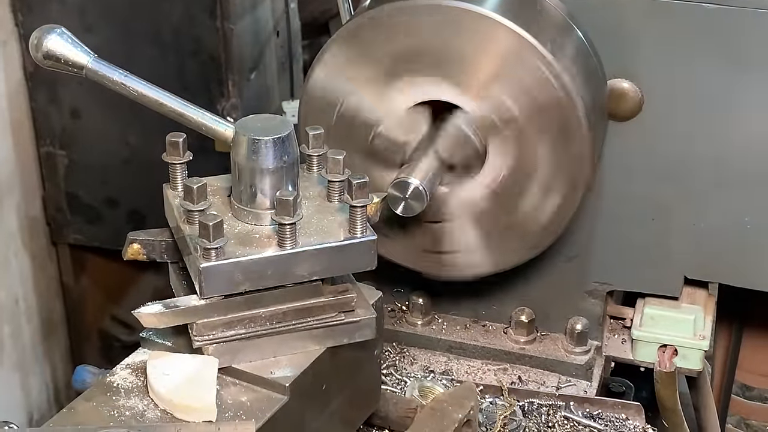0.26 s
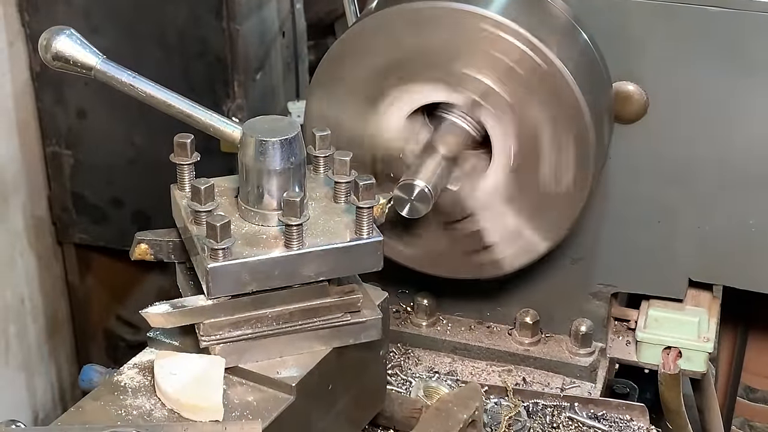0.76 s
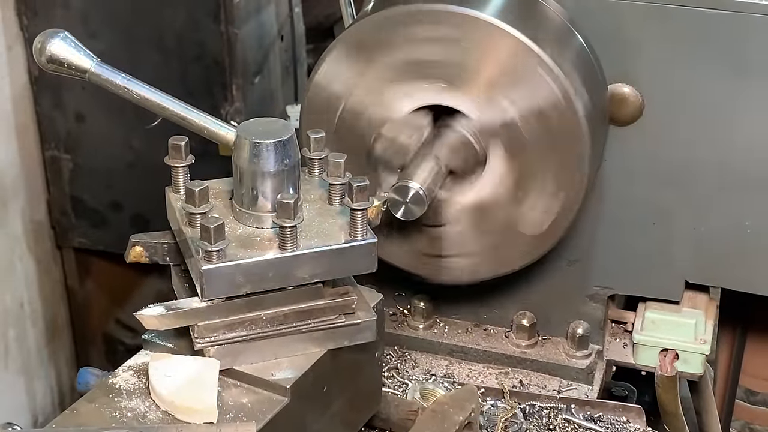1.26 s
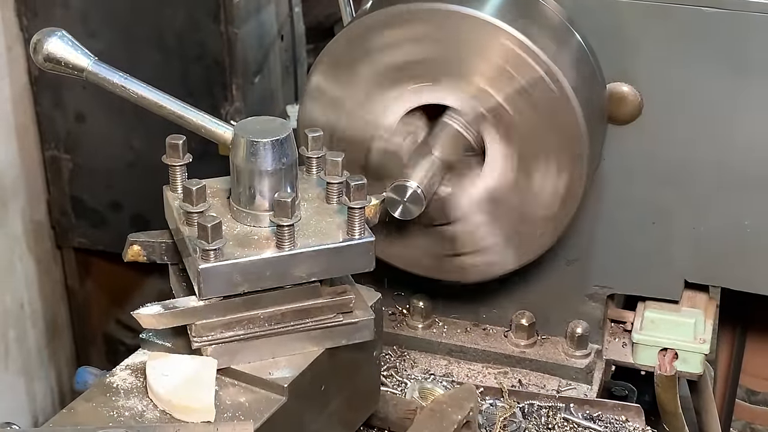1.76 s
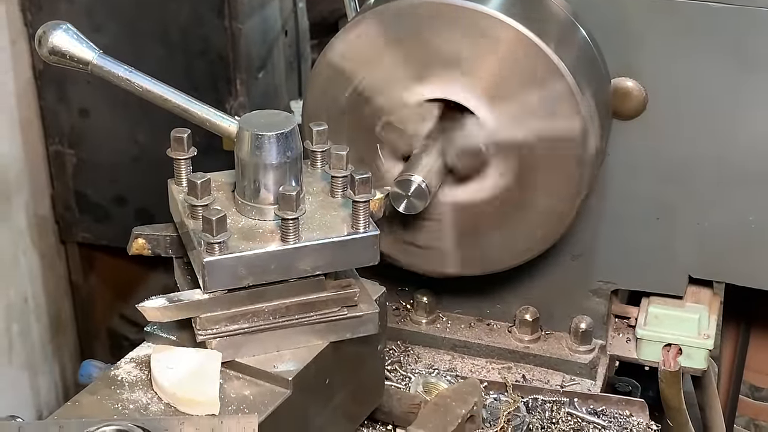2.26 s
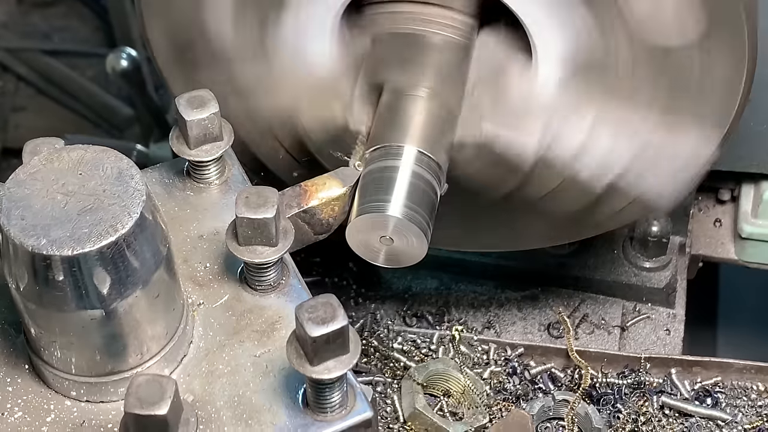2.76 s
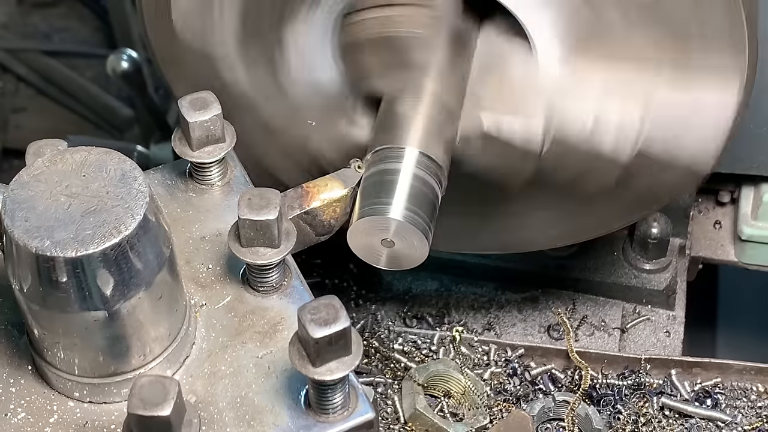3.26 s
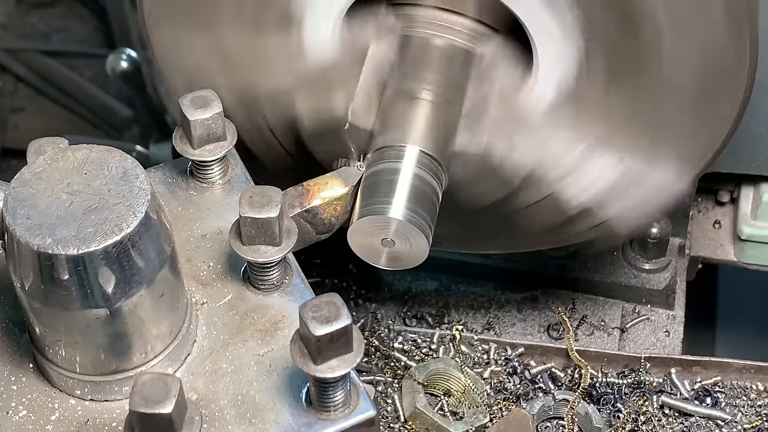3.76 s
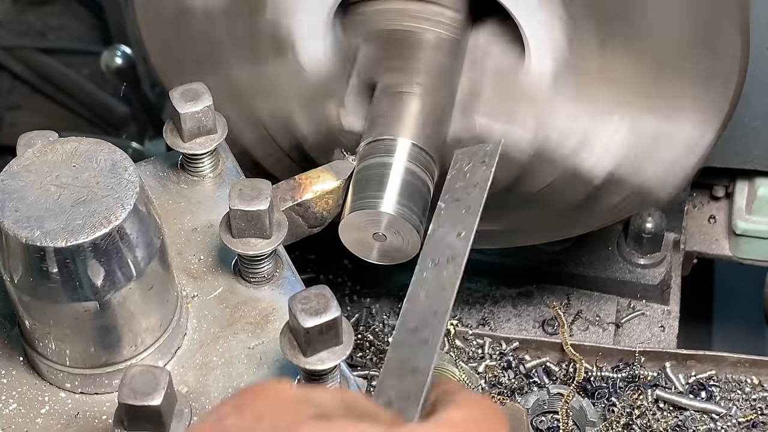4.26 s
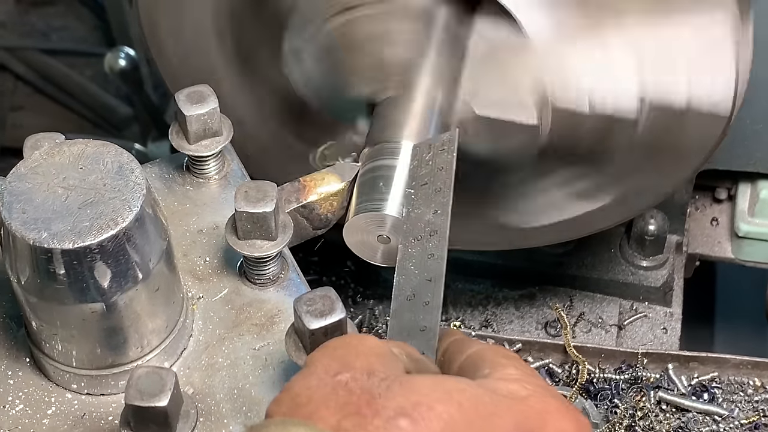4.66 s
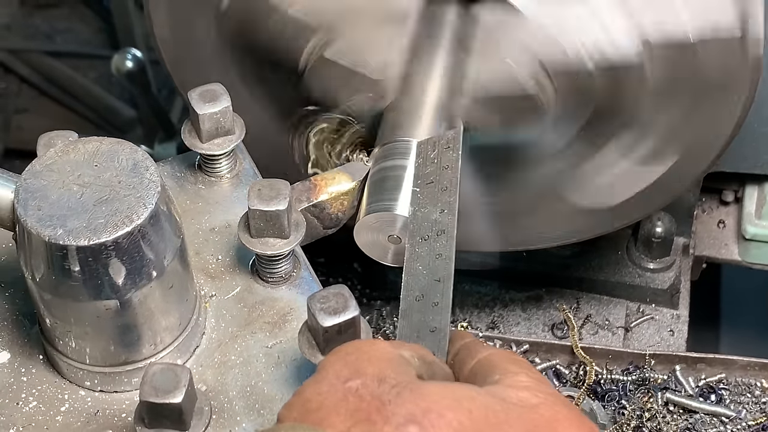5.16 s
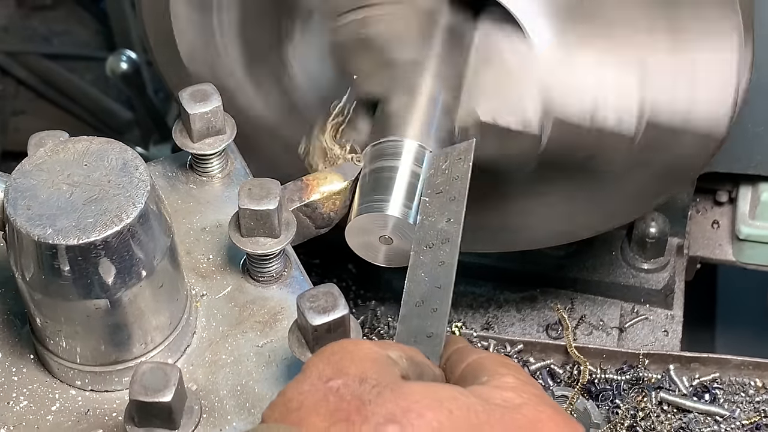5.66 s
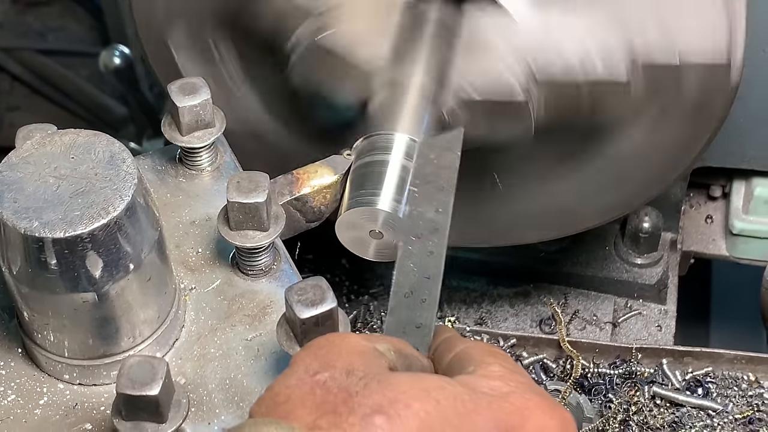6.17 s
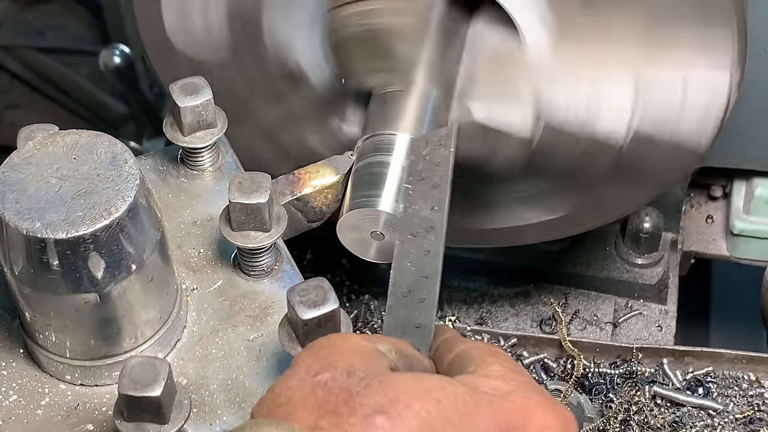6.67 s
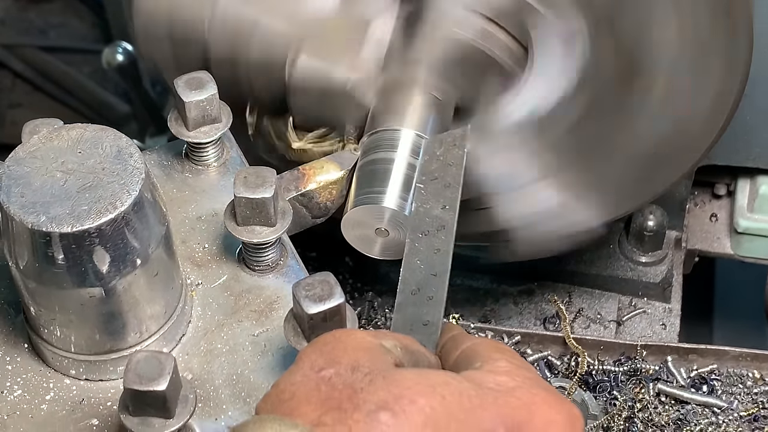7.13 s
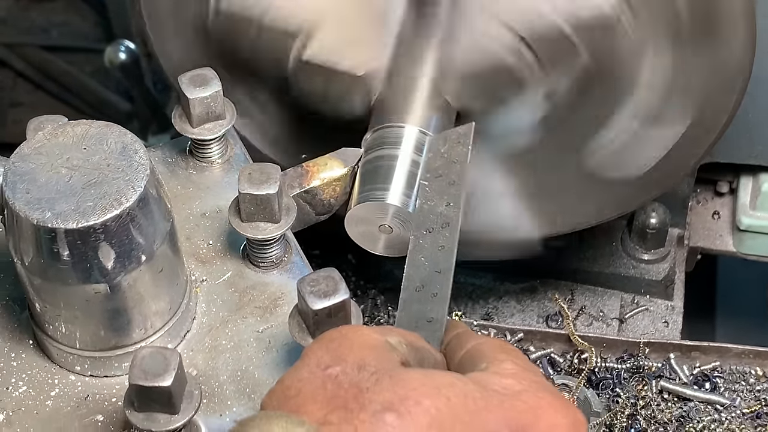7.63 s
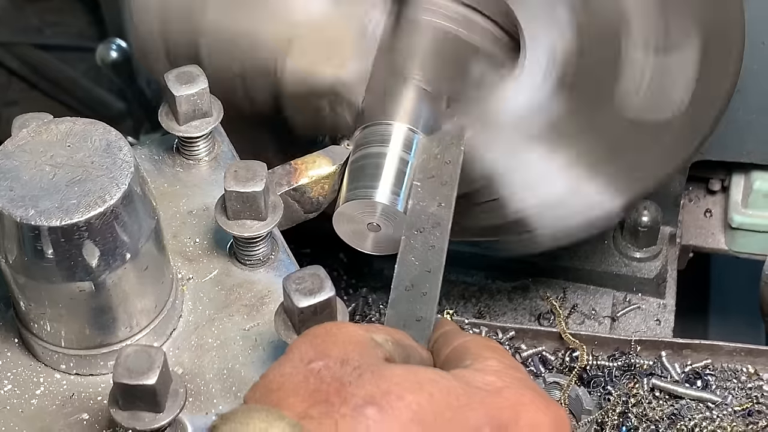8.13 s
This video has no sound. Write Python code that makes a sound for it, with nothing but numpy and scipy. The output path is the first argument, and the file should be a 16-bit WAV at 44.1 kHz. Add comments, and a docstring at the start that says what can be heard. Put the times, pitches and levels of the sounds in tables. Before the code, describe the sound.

A metal lathe hums and rumbles while its cutting tool squeals piercingly, with rhythmic bar squeaks at first, then a closer, wavering high whine and chip hiss.

```python
"""In a hard workshop with a short echo, a lathe turns a steel bar about eight times a second, heard far, then close.
The self-excited tool squeals as a wandering tone with an octave, flat and quiet at jams, stronger at bites.
At first the bar squeaks and chirps by friction as gliding tones; later it mostly rings as a ragged, turn-paced mode.
Shaped noise makes chip hiss, cutting, scrapes and gear rumble; decaying partials crackle and knock.
Beating sines make the hum of motor and belt."""
import sys
import numpy as np
from scipy import signal
from scipy.fft import rfft, irfft, next_fast_len
from scipy.io import wavfile

SR = 44100
rng = np.random.default_rng(int(sys.argv[2]) if len(sys.argv) > 2 else 0)


def materialize(psi):
    """Save the field psi as 16-bit PCM at rate SR to the path in sys.argv[1].

    A 1-D psi becomes a single channel; in a 2-D psi each row is a channel.
    """
    bounded = np.clip(np.atleast_2d(psi).T, -1, 1)
    quanta = np.round(bounded * 32767).astype(np.int16)
    wavfile.write(sys.argv[1], SR, quanta)


N = 370440

CLOSE_S = 2.35  # the sound switches at once from a far to a close listening position
RULE_S = 4.65  # from here a steel rule held at the bar reflects the hiss
TOP_HZ = 15100
# Spindle angle. Each row: time in seconds, turns done.
SPINDLE_TURNS = [(-.02, 0), (1.06, 9), (2.273, 19), (2.44, 20), (3.655, 30), (4.875, 40), (6.66, 55),
                 (7.47, 62), (8.44, 70)]
# Load on the running noises. Each row: time in seconds, then drive hum, gear rumble, cutting noise and
# chip hiss in dB, to which each source adds its own offset.
MACHINE_LOAD = [(0, -20, -25, -33.5, -39), (.55, -18.5, -22.5, -34, -41), (.68, -22, -26, -35.5, -42.5),
                (1.1, -26, -29.5, -40, -44.5), (1.8, -26, -29, -39.5, -45.5), (2.3, -28.5, -32, -42, -48.5),
                (2.45, -27.5, -30, -39.5, -44.5), (4.2, -26.5, -30.5, -40.5, -47),
                (5, -27.5, -32.5, -42, -47), (6.8, -30, -32.5, -43, -46.5), (8.4, -28, -32.5, -42, -47.5)]
# Motor, belt and gear tones. Each row: pitch in Hz, wander in Hz, relative level in dB from afar, from close by.
DRIVE_TONES = [(113, 0.63, -8.5, -5), (130.8, 0.19, -9.5, -7.5), (137.64, 0.49, -1.5, -3),
               (147.8, 0.9, -19, -11), (187, 2.51, -18, -14.5), (263, 2.59, -19, -10.5),
               (282.6, 4.5, -30, -16.5), (298, 2.27, -16.5, -12), (488.6, 4.91, -12.5, -10),
               (500, 4.93, -8.5, -15), (667, 8.02, -15, -26), (707.4, 12.32, -26.5, -13),
               (1040, 5.02, -21.5, -20)]
# Headstock rumble spectrum. Each row: frequency in Hz, relative dB per Hz from afar, from close by.
GEAR_SPECTRA = [(25, -36, -42), (38, -21, -33), (50, -4, -12), (63, -9, -13.5), (76, -5, 3.5),
                (108, 11, 4.5), (166, -2, -1), (227, -1.5, -0.5), (288, -1, 4.5), (330, -4.5, -4),
                (436, 0.5, 1.5), (580, -4.5, -4.5), (697, -3, -2.5), (1076, -12.5, -11.5), (1560, -47, -35)]
# Interaural likeness of broad noise. Each row: frequency in Hz, correlation of left and right.
EAR_CORRELATION = [(100, 0.88), (300, 0.95), (600, 0.77), (1200, 0.018), (2500, 0.32), (5000, 0),
                   (14000, 0)]
# Spectrum of tearing metal. Each row: frequency in Hz, relative dB per Hz.
TEAR_SPECTRUM = [(600, -16), (1100, -0.5), (1450, -1), (2100, -3), (3000, -6), (4500, -11), (6000, -11),
                 (9000, -73)]
# Resonances of tool post and chuck. Each row: pitch in Hz, width in Hz, relative level in dB.
POST_MODES = [(2070, 39, 3.5), (2330, 90, -14), (2970, 21, -2.5), (3360, 60, 1), (5150, 24, -2),
              (6530, 240, 8)]
# Chip hiss spectrum. Each row: frequency in Hz, relative dB per Hz in the open, with the steel rule beside it.
CHIP_SPECTRA = [(3000, 2.5, -5), (4700, 10, 7.5), (6030, 6.5, 4), (6500, 8, -1), (8240, 11.5, 10.5),
                (8800, 7, 4), (10200, 8, 9.5), (11870, -6, -8.5), (12500, 8.5, 12.5), (14050, 5, 5.5),
                (14500, -10, 6), (15400, -26, -4)]
# The long chip drags over tool post and bar. Each row: centre in seconds, bell half-length in seconds,
# ring level in dB, ring pitch in Hz, width in Hz of each of two cascaded resonators, hiss above the ring in dB.
CHIP_SCRAPES = [(2.4, 0.19, -29.5, 762, 170, -12), (2.866, 0.055, -32, 810, 150, -16),
                (2.962, .06, -39, 1440, 90, -17), (3.003, 0.55, -34, 810, 168, -12),
                (3.464, 0.16, -38, 1302, 60, -21), (4.38, .09, -40, 2630, 140, -10),
                (4.43, 0.29, -34.5, 784, 150, -12), (5.3, 0.087, -40.5, 1340, 240, -14),
                (5.413, 0.052, -34, 1450, 190, -17), (5.443, 0.22, -33, 795, 99, -28),
                (5.64, 0.04, -40, 1460, 120.4, -20), (6.598, 0.018, -26.5, 804, 160, -29),
                (6.648, 0.048, -29, 814, 159, -26), (6.717, 0.083, -32, 2330, 70, -14),
                (6.752, 0.068, -40.5, 1310, 400, 3), (7.479, 0.048, -34.5, 2320, 90, -2.5),
                (8.072, 0.1, -33.5, 800, 169, -6.5)]
# A sharp chip edge sings. Each row: pitch in Hz, width in Hz, relative level in dB.
CHIP_EDGE_MODES = [(4500, 30, 1), (7700, 25, -2), (8630, 25, -1)]
EDGE_S, EDGE_LENGTH_S, EDGE_DB = 2.96, 0.086, -37.5  # centre, bell half-length, peak level
# Ringing of the tool holder before its pulse. Each row: time in seconds, level in dB.
HOLDER_LEVELS = [(0, -39.5), (.47, -32.5), (.7, -40), (1.0, -39), (1.3, -46), (4.2, -46), (8.4, -47.5)]
# Ringing of the bar before its pulse. Each row: time in seconds, level in dB.
BAR_LEVELS = [(0, -43), (.7, -45), (1.2, -34.5), (2.3, -36), (2.38, -47), (2.6, -40.5), (4.2, -43.5),
              (4.45, -46.5), (7.3, -47), (7.58, -42), (7.8, -53), (8.4, -47)]
BAR_HZ = 2352  # pitch at which squeaks and chirps settle
SQUEAK_ROUGH, SQUEAK_WIDTH_HZ = .25, 60
# Chirps as the edge slips. Each row: centre in seconds, time from peak to 1/e in seconds, level in dB, top pitch in Hz.
SLIP_CHIRPS = [(0.073, .016, -30.5, 2430), (0.309, .014, -35, 2430), (.913, .012, -31, 2430),
               (1.036, 0.011, -25.5, 2460), (1.154, 0.012, -28, 2420), (1.273, 0.011, -26.5, 2420),
               (1.395, 0.015, -21.5, 2450), (1.518, 0.0095, -18, 2470), (1.641, .012, -29, 2420),
               (1.88, .012, -27, 2440), (1.999, .011, -23.5, 2480), (2.12, .011, -22.5, 2436),
               (2.241, .012, -20.5, 2445)]
# Falling squeaks as the bar's high side meets the tool. Each row: start in seconds, length in seconds,
# level in dB, first pitch in Hz.
BAR_SQUEAKS = [(.003, 0.048, -26.5, 2466), (0.122, 0.026, -29, 2470), (0.237, 0.037, -26, 2450),
               (0.354, 0.048, -28, 2480), (0.596, 0.036, -22.5, 2460), (0.712, 0.045, -29, 2546),
               (0.83, 0.067, -27.5, 2530), (0.952, .044, -24.5, 2494), (1.07, 0.043, -16.5, 2590),
               (1.193, 0.051, -19.5, 2505), (1.32, 0.059, -19.5, 2500), (1.438, 0.051, -19.5, 2516),
               (1.555, 0.048, -22, 2537), (1.676, 0.038, -20.5, 2594), (1.794, 0.042, -21, 2566),
               (1.92, 0.049, -14.5, 2514), (2.042, 0.044, -18.5, 2470), (2.167, 0.04, -20, 2417),
               (2.287, 0.052, -23.5, 2450), (3.546, 0.036, -31, 2400), (3.671, 0.05, -35, 2384),
               (4.158, 0.053, -36.5, 2397), (5.599, 0.042, -35.5, 2410), (7.487, 0.027, -19, 2560),
               (7.604, 0.027, -20, 2570)]
# A scraping chip whistles near the squeal's pitch. Each row: time in seconds, pitch in Hz, level in dB.
WHISTLE_GLIDE = [(7.2, 5270, -90), (7.27, 5310, -35), (7.325, 5350, -29), (7.37, 5210, -30), (7.4, 5090, -29),
                 (7.475, 5030, -30), (7.52, 5060, -90)]
# Tool chatter before jams and bites. Each row: time in seconds, level in dB, roughness from 0 to 1.
TOOL_CHATTER = [(0, -34, 0.93), (.57, -31, 0.92), (.64, -17, 0.58), (1.0, -18.5, 0.16), (1.06, -27, 0.73),
                (1.6, -26.5, 0.47), (2.0, -28.5, 0.56), (2.33, -30, 0.67), (2.42, -26.5, 0.19),
                (3.4, -23.5, 0.36), (4.24, -25.5, 0.35), (4.37, -20, 0.24), (5.6, -21, 0.29),
                (7.2, -22, 0.34), (7.45, -25.5, 0.52), (7.7, -23.5, 0.42), (7.84, -20.5, 0.48),
                (8.2, -23.5, 0.26), (8.4, -22, 0.42)]
# The chip jams and damps the tool. Each row: centre in seconds, bell half-length in seconds,
# pitch sag in Hz (negative rises), level drop in dB.
CHIP_JAMS = [(0.709, 0.022, -0.5, 6.5), (1.328, 0.019, -1.5, 7), (1.51, 0.023, -1, 7), (1.68, 0.059, 9, 13),
             (1.8, 0.082, 20.5, 10.5), (2.054, 0.018, 3, 17), (2.166, 0.062, 14, 8.5),
             (2.385, 0.077, 70, 5), (2.648, 0.035, 0.5, 5), (2.864, .05, 45, 0), (3.12, .04, 9, 7),
             (3.383, .04, 70, 0), (3.611, 0.05, 50.5, 10), (3.77, 0.039, 17.5, 2.5), (4.128, .08, 47.5, 5),
             (4.543, 0.022, 5, 7.5), (4.887, 0.042, 6.5, 4), (5.075, 0.013, -1, 11), (5.274, 0.15, 8.5, 7),
             (5.499, 0.02, 2, 10), (5.663, 0.054, 30, 1.5), (5.766, 0.033, -14.5, 4.5),
             (5.862, 0.042, 34.5, 1.5), (5.997, 0.037, 0.5, 4.5), (6.387, 0.079, 15, 3),
             (6.676, 0.029, 51.5, 8.5), (6.927, 0.11, 29.5, 4), (7.226, 0.023, 3, 3), (7.485, 0.05, 25, 9),
             (7.739, 0.018, 1, 12), (8.007, .06, 4.5, 6)]
# The edge digs in. Each row: centre in seconds, bell half-length in seconds,
# pitch rise in Hz (negative falls), level rise in dB.
EDGE_BITES = [(0.213, .035, 1, 8.5), (0.632, 0.033, -0.5, 4.5), (1.242, 0.017, 0.5, 3),
              (1.476, .03, -0.5, 4.5), (1.6, 0.014, 0.5, 4), (1.908, 0.024, -0.5, 5.5),
              (2.255, 0.055, 0, 3), (2.573, 0.12, -0.5, 8), (3.163, 0.024, -19, 5), (3.43, .03, -25, 6),
              (3.56, 0.024, 45, 5), (3.967, 0.039, 2, 6), (5.17, 0.033, 1.5, 1.5), (7.357, 0.052, -3, 8)]
# Standing waves at the two ports. Each row: time in seconds, left lead in radians, left minus right in dB.
PORT_WAVES = [(2.3, .45, -.7), (2.36, -2.55, -.8), (4.23, -2.55, -.6), (4.38, .7, 0), (7.3, .7, 1.5),
              (8.3, 1.5, 3.5)]
SQUEAL_HZ, LOOSE_HZ = 5197, 5280  # tool pitch when locked in, and when it only rasps
LOCK_S, LOCK_TIME_S = .61, 0.0612  # end and duration of the lock-in
WOBBLE_HZ = 7.1  # runout of the bar bends the pitch once a turn
SETTLE_S = 5.2  # from here the squeal's strength wavers less


def undb(db):
    """Level law: amplitude gain is ten to the power of decibels over twenty."""
    return 10 ** (np.asarray(db) / 20)


def unit(x):
    """Normalisation: equal mean power corresponds to rms 1."""
    return x / np.sqrt(np.mean(x ** 2))


def curves(table):
    """Linear interpolation: each column of a timed table becomes a continuous control."""
    s, *columns = np.transpose(table)
    return [np.interp(np.arange(N) / SR, s, c) for c in columns]


def blend(s, before, after, fade_s=0.0086):
    """Linear crossfade: one value or sound yields to another, complete at time s."""
    share, = curves([(s - fade_s, 0), (s, 1)])
    return (1 - share) * before + share * after


def over_bins(points):
    """Logarithmic frequency scale: values are joined along the axis for each spectral bin."""
    hz, value = np.transpose(points)
    bin_hz = np.arange(N // 2 + 1) * SR / N
    return np.interp(np.log(bin_hz + 1), np.log(hz), value)


def walk(rate):
    """Low-passed noise: a smooth random motion of rms 1 varies about rate times a second."""
    size = next_fast_len(int(min(20 * rate / SR, 1) * N))
    hz = np.arange(size // 2 + 1) * SR / N
    steps = rng.standard_normal(size)
    smooth = irfft(rfft(steps) / (1 + (hz / rate) ** 2), size)
    return np.interp(np.linspace(0, size - 1, N), np.arange(size), unit(smooth))


def swells(times, lengths, sizes):
    """Superposition: bell-shaped swells from separate events add."""
    t, out = np.arange(N) / SR, np.zeros(N)
    for s, length, size in zip(times, lengths, sizes):
        near = np.abs(t - s) < 2 * length
        out[near] += size * np.exp(-2 * ((t[near] - s) / length) ** 2)
    return out


def colour(x, points):
    """Linear filtering: multiplication in frequency shapes a sound, then rms is set to 1."""
    return unit(irfft(rfft(x) * undb(over_bins(points)), N))


def colours(x, table):
    """Parallel filtering: one sound passes under each spectrum column of a table."""
    hz, *columns = np.transpose(table)
    return [colour(x, np.transpose([hz, db])) for db in columns]


def resonate(x, hz, width_hz):
    """Damped resonance: a mode selects a band of its excitation, at rms 1."""
    return unit(signal.lfilter(*signal.iirpeak(hz, hz / width_hz, fs=SR), x))


def spread_noise():
    """Diffuse-field coherence: the ears agree most in the bass and not at all in the high treble."""
    alike = over_bins(EAR_CORRELATION)
    mid, side = rfft(rng.standard_normal((2, N))) * np.sqrt([1 + alike, 1 - alike])
    return irfft(np.array([mid + side, mid - side]), N)


def pan(db):
    """Interaural level difference: half the decibels raise one ear and half lower the other."""
    return undb(np.array([db, -db]).reshape(2, -1) / 2)


def frayed(rough, width_hz):
    """Random modulation: roughness takes a complex envelope from steady (0) to narrow noise (1) per ear."""
    fray = np.array([walk(width_hz) + 1j * walk(width_hz) for _ in range(2)]) / np.sqrt(2)
    return np.sqrt(1 - rough ** 2) + rough * fray


def angle(hz):
    """Phase as the time integral of frequency."""
    return 2 * np.pi * np.cumsum(hz) / SR


def workshop(x, t60=0.91, wet_db=-14):
    """Reverberation: hard surfaces return dense echoes of exponential decay, here cut at half a second."""
    t = np.arange(SR // 2) / SR
    tail = rng.standard_normal((2, len(t))) * np.exp(-np.log(1000) * t / t60)
    tail /= np.sqrt(np.sum(tail ** 2, axis=1, keepdims=True))
    return x + undb(wet_db) * signal.fftconvolve(x, tail, axes=1)[:, :N]


def drive(hum_db, rumble_db, tones_db=-1.85, gears_db=2.02, rattle_db=1.5, pan_db=-1.1):
    """Beats: neighbouring motor and belt tones interfere above the broadband rumble of the gears."""
    hz, wander, far_db, near_db = np.transpose(DRIVE_TONES)
    lines = np.array([np.sin(angle(f + w * walk(5.97))) for f, w in zip(hz, wander)])
    far_tones, near_tones = unit(undb(far_db) @ lines), unit(undb(near_db) @ lines)
    tones = blend(CLOSE_S, far_tones, near_tones)
    far_gears, near_gears = colours(spread_noise(), GEAR_SPECTRA)
    gears = blend(CLOSE_S, far_gears, near_gears) * undb(rattle_db * walk(25))
    return pan(pan_db) * (tones * undb(hum_db + tones_db) + gears * undb(rumble_db + gears_db))


def rattle(db, count=1500, low_hz=1000, high_hz=9000, t60=0.061, spread_db=16, level_db=-6):
    """Impact excitation: each small metal part, by default a bit of chip, rings and decays exponentially."""
    out = np.zeros((2, N + SR))
    t = np.arange(int(t60 * SR)) / SR
    decay = np.exp(-np.log(1000) * t / t60)
    for when, pitch, size, side, lag in rng.random((count, 5)):
        hz = low_hz * (high_hz / low_hz) ** pitch
        # the lag between the ears is a fraction of a cycle
        ring = np.sin(2 * np.pi * (hz * t + np.array([[0], [lag]]))) * decay
        # the small, high parts are quieter
        gain = undb(spread_db * size) * np.sqrt(low_hz / hz)
        start = int(when * N)
        out[:, start:start + len(t)] += pan(6 * (side - .5)) * ring * gain
    return unit(out[:, :N]) * undb(db + level_db)


def gear_knocks(rumble_db):
    """Backlash: gear teeth knock in their play, hardest under the heavy first load."""
    level_db = rumble_db + blend(0.61, -7, -15.5)
    return rattle(level_db, count=600, low_hz=219, high_hz=1104, level_db=-0.5)


def cutting(cut_db, hiss_db, tear_db=5, far_post_db=-4, near_post_db=-7, open_db=4, rule_db=7.5,
            crackle=0.3, flicker_db=1, waver_db=8.5, surge_db=1.84):
    """Shear fracture: tiny uneven slips of the metal radiate noise and excite the modes of the tool post."""
    slips = unit(np.exp(crackle * walk(1430))) * undb(flicker_db * walk(21))
    tear = colour(spread_noise() * slips, TEAR_SPECTRUM) * undb(tear_db)
    push = spread_noise() * slips
    post = 0
    for hz, width_hz, db in POST_MODES:
        mode_db = db + waver_db * np.tanh(walk(19))
        post = post + undb(mode_db) * resonate(push, hz, width_hz)
    post = unit(post) * blend(CLOSE_S, undb(far_post_db), undb(near_post_db))
    direct, mirrored = colours(spread_noise() * slips, CHIP_SPECTRA)
    hiss = blend(RULE_S, direct * undb(open_db), mirrored * undb(rule_db), fade_s=0.06)
    return (tear + post) * undb(cut_db) + hiss * undb(hiss_db + surge_db * walk(4))


def scrapes(grit=0.4, upper_ratio=1.66, upper_db=-15, rasp_db=-10):
    """Stick-slip friction: brief rubbing excites a hollow mode, a weaker upper one, a dry rasp and hiss."""
    out = np.zeros((2, N + SR))
    rub = spread_noise() * np.exp(grit * walk(150))
    rasp, hiss = colour(rub, TEAR_SPECTRUM), colours(rub, CHIP_SPECTRA)[0]
    t = np.arange(SR // 2) / SR
    for s, length, db, hz, width_hz, hiss_db in CHIP_SCRAPES:
        start = int(s * SR) - len(t) // 2
        span = slice(start, start + len(t))
        pressure = np.exp(-2 * ((t - t.mean()) / length) ** 2)
        # two resonators in cascade steepen the skirts of each mode
        low, high = (resonate(resonate(rub[:, span], f, width_hz), f, width_hz) for f in (hz, hz * upper_ratio))
        ring = low + undb(upper_db) * high
        friction = undb(rasp_db) * rasp[:, span] + undb(hiss_db) * hiss[:, span]
        out[:, span] += undb(db) * pressure * (ring + friction)
    return out[:, :N]


def singing_edge():
    """Modal selection: the rubbed chip edge answers noise in a few thin, high modes."""
    rub = spread_noise()
    ring = sum(undb(db) * resonate(rub, hz, width_hz) for hz, width_hz, db in CHIP_EDGE_MODES)
    return unit(ring) * swells([EDGE_S], [EDGE_LENGTH_S], [undb(EDGE_DB)])


def rubbed_mode(turns, levels, hz, rough, width_hz, bend_hz, drift_hz, pulse_db, flutter_db, heaviest):
    """Forced mode: a ragged drive swells it at the heaviest share of each turn and bends its pitch."""
    turn = 2 * np.pi * (turns - heaviest)
    pitch = hz - bend_hz * np.sin(turn) + drift_hz * walk(18)
    db = curves(levels)[0] + pulse_db * np.cos(turn) + flutter_db * walk(35)
    shake = frayed(rough, width_hz) * np.exp(1j * angle(pitch))
    return np.sqrt(2) * undb(db) * shake.imag


def holder_ring(turns):
    """Forced vibration: the cut shakes the tool holder at its own mode."""
    return rubbed_mode(turns, HOLDER_LEVELS, hz=3962, rough=0.98, width_hz=75, bend_hz=15.5,
                       drift_hz=32.04, pulse_db=2, flutter_db=2.5, heaviest=0.08)


def bar_ring(turns):
    """Forced vibration: the cut keeps the bar ringing between squeaks."""
    return rubbed_mode(turns, BAR_LEVELS, hz=2392, rough=.7, width_hz=40, bend_hz=-36,
                       drift_hz=20, pulse_db=4, flutter_db=2.5, heaviest=.36)


def curls(arch=0.86, jitter_hz=12):
    """Transient slip: pitch and level of the bar rise together and fall again."""
    t, out = np.arange(N) / SR, np.zeros((2, N))
    jitter, grain = jitter_hz * walk(70), frayed(SQUEAK_ROUGH, SQUEAK_WIDTH_HZ)
    for s, length, db, top_hz in SLIP_CHIRPS:
        span = np.abs(t - s) < 3 * length
        push = np.exp(-((t[span] - s) / length) ** 2)
        hz = BAR_HZ + (top_hz - BAR_HZ) * push ** arch + jitter[span]
        shake = grain[:, span] * np.exp(1j * angle(hz))
        out[:, span] += undb(db) * push * shake.imag
    return np.sqrt(2) * out


def squeaks(attack_s=0.018, release_s=0.013, glide_s=0.0149, tail_db=-10, tail_s=0.042, jitter_hz=13):
    """Friction excitation: the bar catches at one pitch, glides to its own, then lets go and rings on."""
    t, out = np.arange(N) / SR, np.zeros((2, N))
    jitter, grain = jitter_hz * walk(70), frayed(SQUEAK_ROUGH, SQUEAK_WIDTH_HZ)
    for s, length, db, first_hz in BAR_SQUEAKS:
        span = (t >= s) & (t < s + length + 3 * tail_s)
        age = t[span] - s
        hz = BAR_HZ + (first_hz - BAR_HZ) * np.exp(-(age / glide_s) ** 2) + jitter[span]
        after = np.maximum(age - length + release_s, 0)
        release = np.exp(-(after / release_s) ** 2)
        tail = undb(tail_db) * np.exp(-(after / tail_s) ** 2)
        envelope = np.minimum(age / attack_s, 1) * np.maximum(release, tail)
        shake = grain[:, span] * np.exp(1j * angle(hz))
        out[:, span] += undb(db) * envelope * shake.imag
    return np.sqrt(2) * out


def chip_whistle(rough=0.34, width_hz=60, overtone_db=-17):
    """Friction whistle: for a moment the scraping chip whistles at a gliding pitch with its octave."""
    hz, db = curves(WHISTLE_GLIDE)
    shake = frayed(rough, width_hz) * np.exp(1j * angle(hz))
    return np.sqrt(2) * undb(db) * (shake + undb(overtone_db) * shake ** 2).imag


def chatter(turns):
    """Variable damping: jams weaken the tool's vibration, bites strengthen it, and both shift its pitch."""
    db, rough = curves(TOOL_CHATTER)
    jam_s, jam_length, sag_hz, drop_db = np.transpose(CHIP_JAMS)
    bite_s, bite_length, rise_hz, rise_db = np.transpose(EDGE_BITES)
    db = db + swells(bite_s, bite_length, rise_db) - swells(jam_s, jam_length, drop_db)
    hz = blend(LOCK_S, LOOSE_HZ, SQUEAL_HZ, LOCK_TIME_S) - WOBBLE_HZ * np.cos(2 * np.pi * turns)
    hz = hz + swells(bite_s, bite_length, rise_hz) - swells(jam_s, jam_length, sag_hz)
    return db, hz, rough


def squeal(turns, jitter_hz=5, wander_hz=4, late_wander_hz=11, jaws_at=0.13, flutter=0.92, jaws=0.71,
           runout=0.18, grip=1.0, width_hz=88, far_overtone_db=-21.5, near_overtone_db=-27,
           overtone_growth=0.23, sway_rad=0.27, unsettled_db=1.06, settled_db=0.73):
    """Self-excitation: the tool feeds its own vibration, whose clean tone frays to a rasp as the chip breaks."""
    db, hz, rough = chatter(turns)
    db = db + blend(SETTLE_S, unsettled_db, settled_db) * walk(12)
    lead, pan_db = curves(PORT_WAVES)
    # the hand-held microphone sways through the standing waves
    lead = lead + sway_rad * walk(1.5)
    wander = blend(SETTLE_S, wander_hz, late_wander_hz) * walk(7)
    phase = angle(hz + jitter_hz * walk(32.4) + wander) + np.array([[1], [-1]]) * lead / 2
    # the swing saturates, and dips as the three jaws and the runout of the bar ease the cut
    jaw_feed = jaws * np.cos(3 * 2 * np.pi * (turns - jaws_at))
    feed = grip + jaw_feed + runout * np.cos(2 * np.pi * turns) + flutter * walk(22)
    swing = unit(2 + np.tanh(feed))
    shake = swing * frayed(rough, width_hz) * np.exp(1j * phase)
    # the edge bites harder one way, so the octave grows with the square of the swing
    overtone_db = blend(CLOSE_S, far_overtone_db, near_overtone_db) + overtone_growth * (db - db.mean())
    return np.sqrt(2) * pan(pan_db) * undb(db) * (shake + undb(overtone_db) * shake ** 2).imag


def scene():
    """Superposition: spindle angle and load govern sources whose pressures add."""
    turns, = curves(SPINDLE_TURNS)
    hum_db, rumble_db, cut_db, hiss_db = curves(MACHINE_LOAD)
    background = drive(hum_db, rumble_db) + gear_knocks(rumble_db) + cutting(cut_db, hiss_db)
    chip = rattle(cut_db) + scrapes() + singing_edge()
    bar = bar_ring(turns) + pan(-1.2) * (curls() + squeaks())
    echoed = workshop(chip + holder_ring(turns) + bar)
    return background + echoed + chip_whistle() + squeal(turns)


def record(dry):
    """Band limitation: the microphone drops the deepest bass and the recorder cuts the top."""
    thinned = signal.sosfilt(signal.butter(4, 38, "high", fs=SR, output="sos"), dry)
    return signal.sosfilt(signal.ellip(10, .2, 80, TOP_HZ, fs=SR, output="sos"), thinned)


dry = scene()
out = record(dry)
materialize(out)
```